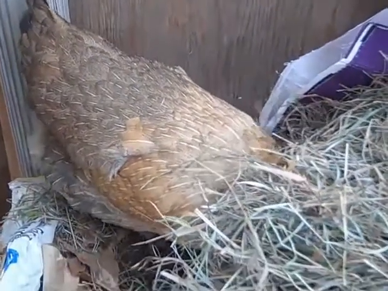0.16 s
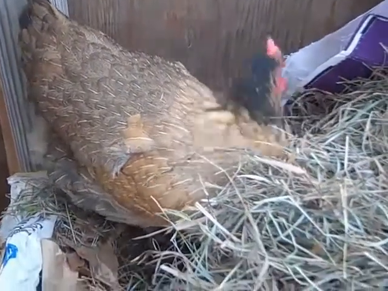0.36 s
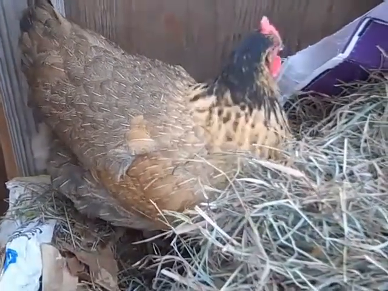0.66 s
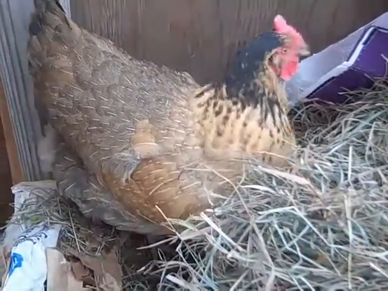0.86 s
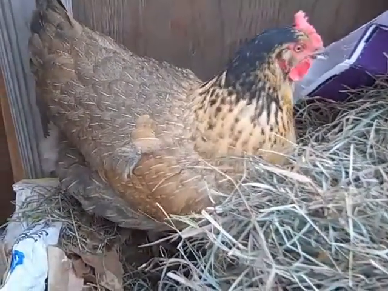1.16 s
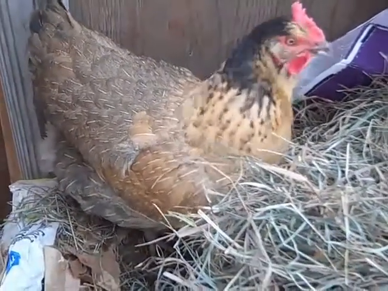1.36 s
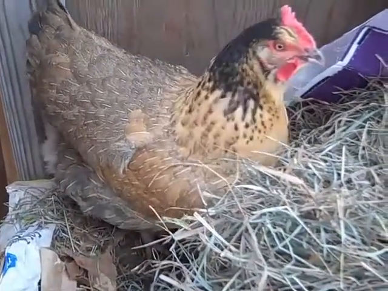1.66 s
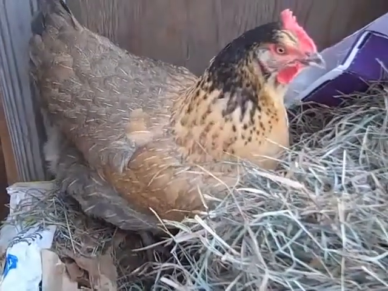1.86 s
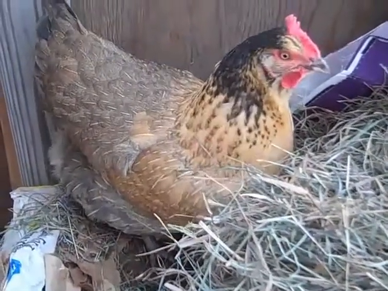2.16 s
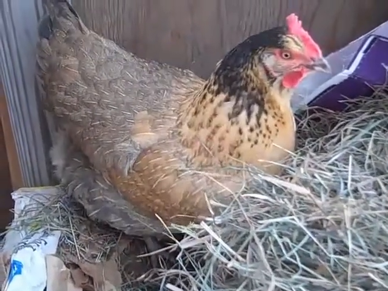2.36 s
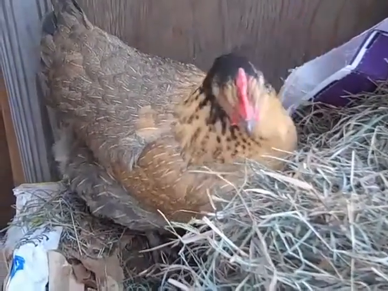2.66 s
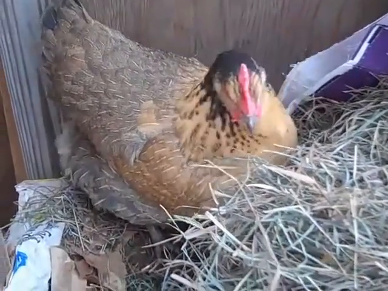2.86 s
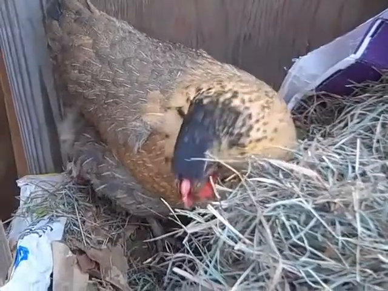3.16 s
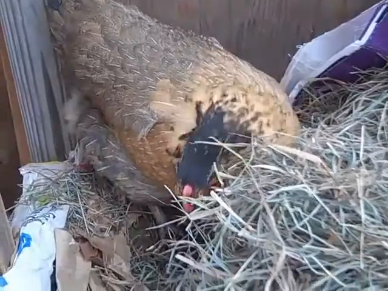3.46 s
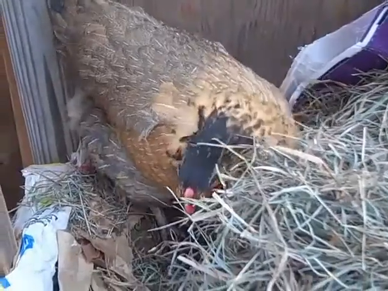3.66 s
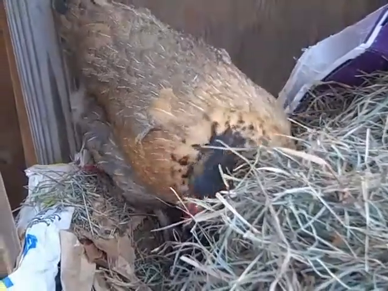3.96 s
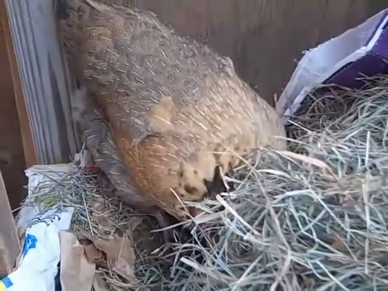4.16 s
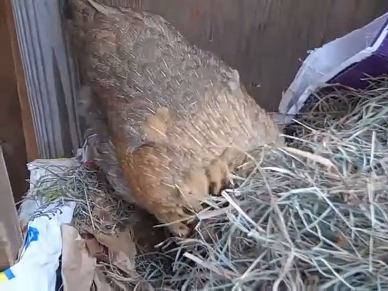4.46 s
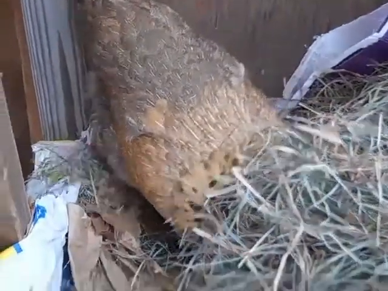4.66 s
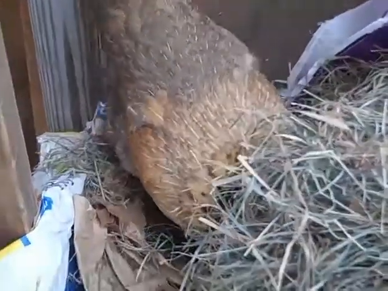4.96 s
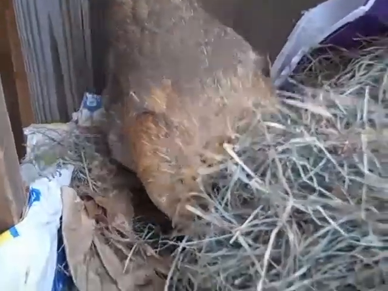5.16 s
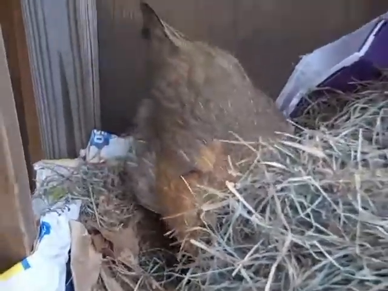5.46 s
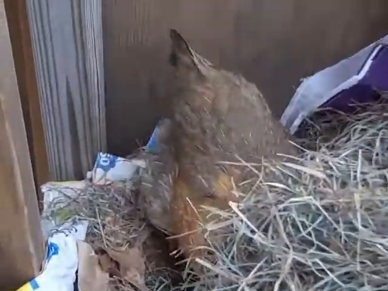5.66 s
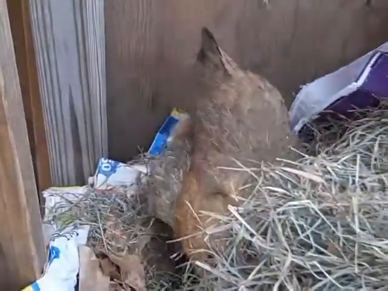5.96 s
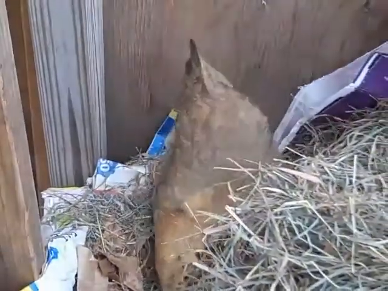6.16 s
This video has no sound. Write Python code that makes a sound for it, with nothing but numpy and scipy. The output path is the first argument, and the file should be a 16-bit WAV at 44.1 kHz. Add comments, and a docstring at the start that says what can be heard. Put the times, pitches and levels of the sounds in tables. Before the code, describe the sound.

Close up in a small wooden coop, a hen clucks in short, dry, low pulses about four times a second, pausing briefly once. Hay rustles lightly at first. As her head goes down the clucks turn softer and muffled, and the hay swishes and snaps more, continuing after her last cluck. A quiet yard hum lies beneath.

```python
"""Hay rustles over the quiet hum of a yard, and a hen in a small wooden coop soon starts to cluck on her nest.
Each cluck is a short run of syrinx pulses through windpipe, chest and beak; its colour follows her head's pose.
As she turns about, filtered noise makes swishes in the hay and short ringing ticks make stalks snap.
Later come faint whistles of narrow-band noise from the yard, and a dull low bump inside two clucks.
Her clucks grow fainter as her head goes down, and the hay stirs on after the last one."""
import sys
import numpy as np
from scipy import signal
from scipy.fft import rfft, irfft
from scipy.io import wavfile
from scipy.ndimage import uniform_filter1d

SR = 44100
rng = np.random.default_rng(int(sys.argv[2]) if len(sys.argv) > 2 else 0)


def store_wav(level_fs):
    """Save 16-bit WAV to argv[1]."""
    pcm = np.round(np.clip(np.atleast_2d(level_fs), -1, 1) * 32767)
    wavfile.write(sys.argv[1], SR, pcm.T.astype(np.int16))


N = 277830  # length of the scene in samples
SPAN = 4096  # samples worked out for one short sound
SPAN_T, SPAN_HZ = np.arange(SPAN) / SR, np.fft.rfftfreq(SPAN, 1 / SR)  # its times (s) and frequencies (Hz)
LEAD_S = .0052  # a dull first flap of the syrinx comes this much before the pulses


def gain_of(db):
    """Turns decibels into a factor."""
    return 10 ** (np.asarray(db) / 20)


def evened(x):
    """Scales a sound to an average (rms) strength of 1."""
    return x / np.sqrt(np.mean(x ** 2) + 1e-20)


def read(points, hz):
    """Reads a curve of (Hz, value) points, joined by straight lines on a log frequency axis."""
    f, value = np.transpose(points)
    return np.interp(np.log(hz + 1), np.log(f + 1), value)


def add(mix, s, sound):
    """Mixes a sound in, starting at s seconds."""
    part = mix[round(s * SR):][:len(sound)]
    part += sound[:len(part)]


def ring(f, hz, width_hz):
    """Response of one resonance, with gain 1 at its centre."""
    return 1j * f * width_hz / (hz ** 2 - f ** 2 + 1j * f * width_hz)


def noise(field_db, size, patchy_db):
    """Noise built from random short spectra; field_db(hz, t) shapes it and soft patches vary its level."""
    frames, hz = 4 * N // size + 5, np.fft.rfftfreq(size, 1 / SR)
    a, b, patches = rng.standard_normal((frames, len(hz), 3)).T
    patches = uniform_filter1d(patches, size=9, axis=0)
    patches = evened(uniform_filter1d(patches, size=12, axis=1))
    t = np.arange(frames) * size / 4 / SR
    spectra = (a + 1j * b) * gain_of(field_db(hz[:, None], t) + patchy_db * patches)
    return signal.istft(spectra, nperseg=size, noverlap=3 * size // 4)[1][:N]


def yard_hum():
    """Steady distant hum and hiss: noise with a fixed colour and two slightly stronger narrow bands."""
    # colour of the hum before levelling: f/Hz, relative density/dB
    colour = [(12, -28), (20, -5), (49, -7.5), (146, -16.5), (399, -6.5), (897, -4), (1530, -8.5),
              (3340, -20.5), (9400, -30.5), (14700, -34), (16000, -50)]
    # narrow bands in the hum: f/Hz, width/Hz, height above the hum/dB
    bands = [(1200, 46, 2.5), (1544, 52, 4)]

    def field_db(hz, t):
        """Colour of the hum, the same at all times."""
        peaks = sum(db / (1 + (2 * (hz - f) / width_hz) ** 2) for f, width_hz, db in bands)
        return read(colour, hz) + peaks + 0 * t

    return gain_of(-61) * evened(noise(field_db, size=1024, patchy_db=.8))


def rustle():
    """Dry stalks slide: hiss with a grain of tiny ticks, rising and falling with the stirring."""
    # colour of the hiss before levelling: f/Hz, relative density/dB
    colour = [(120, -27), (200, -13), (283, -4.5), (1140, 6.5), (1320, -19), (1450, 4), (2560, 1),
              (2910, -2.5), (9580, -4.5), (16000, -12.5)]
    # how the hay is stirred: t/s, level/dB, dullness/dB per octave
    stirring = [(0.0, -70, 0.5), (0.33, -52, 2.8), (0.67, -68, -3), (1.4, -68.5, 5), (1.81, -60, 3.5),
                (2.02, -67.5, 5), (2.28, -84, -12.5), (2.92, -63, 5), (3.86, -80, -13), (4.12, -53.5, 2.6),
                (4.4, -64, 4), (4.63, -68, -3.5), (4.76, -58.5, 0.3), (5.15, -52.5, 0), (5.4, -58, 0),
                (6.1, -59.5, -0.2), (6.3, -53, -2.5)]
    s, level_db, dull_db = np.transpose(stirring)

    def field_db(hz, t):
        """Colour of the hiss, tilted by the dullness of the moment."""
        return read(colour, hz) - np.interp(t, s, dull_db) * np.log2((hz + 100) / 5000)

    hiss = noise(field_db, size=256, patchy_db=1.5)
    ticks_db = 2.1 * np.minimum(rng.exponential(1, N // 80 + 1), 5)
    grain = uniform_filter1d(gain_of(ticks_db).repeat(80)[:N], size=40)
    level = gain_of(np.interp(np.arange(N) / SR, s, level_db))
    return level * evened(hiss * grain)


def windpipe(pipe_hz, pipe_width_hz, progress):
    """Windpipe responses, one per pulse: the neck stretches and the resonance climbs; an air sac rings on."""
    neck_stretch = 0.1  # share by which the resonance climbs over one cluck
    centre = pipe_hz * (1 + neck_stretch * (progress[:, None] - .5))
    # two resonances side by side make a broad top
    apart, width = .4 * pipe_width_hz, .8 * pipe_width_hz
    pipe = ring(SPAN_HZ, centre - apart, width) * ring(SPAN_HZ, centre + apart, width)
    pipe = pipe * ring(SPAN_HZ, centre, 730) / abs(pipe).max()
    # the narrow resonance of the air sac lasts from pulse to pulse
    sac = gain_of(-13) * ring(SPAN_HZ, pipe_hz, 75) * ring(SPAN_HZ, pipe_hz, 750)
    return pipe + sac


def causal(power):
    """Filter with this power response that rings as early as it can (minimum phase)."""
    cepstrum = irfft(np.log(power + 1e-10) / 2)
    cepstrum[1:SPAN // 2] *= 2
    cepstrum[SPAN // 2 + 1:] = 0
    return np.exp(rfft(cepstrum))


def throat_and_beak(treble_db, resonances, tuning, tilt_db):
    """Throat and beak response: a broad treble plus resonances, the higher ones damped more."""
    power = abs(gain_of(treble_db) * ring(SPAN_HZ, 4500, 7000)) ** 2
    for pose_hz, pose_db in resonances:
        hz = tuning * pose_hz
        db = pose_db + tilt_db * np.log2(pose_hz / 3500)  # brightness pivots at 3500 Hz
        width_hz = 220 + 0.017 * hz
        resonance = ring(SPAN_HZ, hz, width_hz) * ring(SPAN_HZ, hz, 4 * width_hz)
        power = power + abs(gain_of(db) * resonance) ** 2
    return causal(power)


def near_echoes():
    """The direct sound plus sparse, quickly fading echoes off her own body and the nest hollow."""
    level_db, fade_s = -5, .0045
    echoes = rng.standard_normal(SPAN) * np.exp(-SPAN_T / fade_s)
    echoes *= (rng.random(SPAN) < .15) * (SPAN_T > .0012)
    return 1 + gain_of(level_db) * rfft(echoes) / np.linalg.norm(echoes)


def cluck(length, first_hz, settled_hz, rough, level_db, swell_db, lead_db, pipe_hz, pipe_width_hz,
          tuning, tilt_db, open_db, pose):
    """Syrinx pulses glide in pitch and swell, then stop; windpipe, chest and beak each colour them."""
    # how her head is held: pose: (chest level/dB, broad treble/dB, [(f/Hz, level/dB) of each resonance])
    poses = {"in the hay": (-17, -35, [(1470, -11.5), (2840, -23.5), (3850, -26), (4900, -27.5),
             (6000, -20.5), (7420, -25), (7980, -26), (9230, -27)]), "low": (-18, -39, [(1530, -14),
             (2300, -19.5), (2940, -13), (3780, -25), (4750, -31), (5880, -25), (6950, -30), (7800, -34),
             (9270, -32)]), "up, side on": (-23.5, -44.5, [(2030, -23.5), (2940, -19.5), (3620, -21.5),
             (4830, -37.5), (5730, -39), (7220, -33), (8900, -41.5), (12000, -40.5)]),
             "up, looking off": (-23, -46, [(2060, -25.5), (2900, -23), (3620, -19), (4800, -39),
             (5750, -42.5), (7700, -39.5), (9100, -41.5), (12300, -48)]),
             "up, facing": (-21, -39, [(1900, -21.5), (2840, -14.5), (3400, -17), (4280, -25), (5600, -35),
             (6950, -30.5), (10300, -33.5), (11600, -33)]), "turning down": (-26, -35.5, [(1910, -17.5),
             (2870, -17.5), (3450, -15), (4450, -24.5), (5590, -29.5), (7000, -29.5), (11100, -37),
             (12000, -33.5), (13480, -36)]), "under the breast": (-13, -47, [(1457, -11), (2480, -9),
             (3980, -37), (4710, -52), (9660, -28), (10500, -30), (11670, -35), (12140, -33)]),
             "tucked": (-12.5, -44.5, [(1675, -10.5), (2150, -17), (2880, -32), (3880, -54), (5900, -38),
             (9480, -23.5), (10550, -33), (11700, -44), (13900, -42)]), "buried": (-15.5, -50, [(1550, -27),
             (2290, -22.5), (3170, -27), (3980, -30), (7400, -42), (9000, -46), (10200, -48),
             (11500, -51)]), "turned away": (-11, -37, [(2300, -17), (2950, -17), (3550, -16.5),
             (4250, -21.5), (5300, -30.5), (6400, -30), (8740, -24), (9800, -27.5), (13000, -35)])}
    chest_db, treble_db, resonances = poses[pose]
    t, u = SPAN_T, SPAN_T / length
    # pitch moves from first to settled (time constant 9.4 ms), rising in most clucks, falling in two;
    # it also sags by up to 12.84 Hz towards the end
    pitch = settled_hz + (first_hz - settled_hz) * np.exp(-t / 0.0094) - 12.84 * np.minimum(u, 1) ** 4
    turns = np.cumsum(pitch) / SR
    # effort swells over half the length; after 80% it falls at 42 dB per length
    swell = np.minimum(u / 0.5, 1) ** 0.65 + 0.5
    effort = gain_of(swell_db * swell - 42 * np.maximum(u - .8, 0))

    # one pulse per turn; roughness shakes its time and size
    at = np.interp(np.arange(int(turns[int(length * SR)]) + 1), turns, t)
    jitter, uneven = rng.standard_normal((16, 2))[:len(at)].T
    even_sizes = np.interp(at, t, effort)
    sizes = even_sizes * gain_of(3 * rough * uneven)
    steady = even_sizes @ np.exp(-2j * np.pi * np.outer(at, SPAN_HZ))
    shaken_at = np.maximum(at + 0.00052 * rough * jitter, 0)
    clicks = np.exp(-2j * np.pi * np.outer(shaken_at, SPAN_HZ))
    bright = sizes ** 1.15 @ clicks  # harder pulses close more sharply

    # turbulence leaks through in a puff after every pulse
    puffs = np.exp(-(turns % 1) / .45)
    air = rfft(puffs * effort * (u < 1.1) * rng.standard_normal(SPAN)) / np.sqrt(SR / 900)

    pipe = windpipe(pipe_hz, pipe_width_hz, at / length)
    core = irfft(sizes @ (clicks * pipe) + .8 * rough * air * pipe.mean(axis=0))
    chest = gain_of(chest_db) * ring(SPAN_HZ, 442, 590) * ring(SPAN_HZ, 290, 1080)
    beak = gain_of(open_db) * near_echoes() * throat_and_beak(treble_db, resonances, tuning, tilt_db)
    rest = irfft(chest * steady + beak * (bright + 2.5 * rough * air))
    # the early flap starts softly, over about 1 ms
    lead = gain_of(lead_db) * sizes[0] * irfft(pipe[0]) * (1 - np.exp(-t / 0.001))
    whole = np.roll(core + rest, round(LEAD_S * SR)) + lead
    return gain_of(level_db) * whole / np.sqrt(np.sum(core ** 2) / (length * SR))


def coop(x):
    """Sparse reflections of random sign off the boards, each band dying at its own speed."""
    # how fast the echoes die: f/Hz, time to fall by 60 dB/s
    fading = [(200, 0.22), (800, 0.14), (2000, 0.12), (4000, 0.11), (12000, 0.097)]
    taps = np.zeros(SR // 2)
    at = np.arange(100, SR // 2 - 20, 16)
    taps[at + rng.integers(0, 16, len(at))] = rng.choice([-1., 1.], len(at))
    hz, t, spectra = signal.stft(taps, SR, nperseg=128)
    faded = spectra * gain_of(-60 * t / read(fading, hz)[:, None])
    tail = signal.istft(faded, SR, nperseg=128)[1]
    return signal.fftconvolve(x, tail / np.linalg.norm(tail))[:N]


def hen():
    """All clucks with their coop echoes; three different echo tails take turns, as if from three spots."""
    # clucks: t/s, length/s, first pitch/Hz, settled pitch/Hz, roughness/0-1, windpipe level/dB, swell/dB,
    # early flap/dB, windpipe f/Hz, windpipe width/Hz, throat tuning/factor, brightness/dB per octave,
    # beak opening/dB, pose/name
    clucks = [(0.1907, 0.033, 199, 223.3, 0.09, -25.5, 3, -8, 825, 121, 1.02, 0.2, -0.1, "in the hay"),
              (0.4206, 0.039, 160.8, 226.3, 0.32, -23, 12, -14, 888, 268, 1.03, -2, -1, "up, looking off"),
              (0.6637, 0.043, 177.1, 222.7, 0.7, -21.5, 11, -35, 850, 240, 1.01, -0.4, -0.7, "up, looking off"),
              (0.9018, 0.041, 168.5, 237.6, 0.19, -21.5, 4.5, -24, 832, 223, 1.016, -3.5, 3, "up, side on"),
              (1.1342, 0.041, 187.2, 243, 0.24, -20.5, 7.5, -19, 822, 230, 0.98, 0.2, 1, "up, side on"),
              (1.3703, 0.041, 178.6, 232.7, 0.46, -20.5, 10.5, -9, 808, 205, 0.98, 1, -1.5, "up, side on"),
              (1.6018, 0.043, 169.2, 228.3, 0.27, -24.5, 7, -9, 778, 248, 1.01, -0.2, 0.2, "up, facing"),
              (1.8696, 0.044, 174, 219.4, 0.44, -24.5, 9.5, -20, 813, 310, 1.01, -1, 0, "up, facing"),
              (2.5434, 0.04, 190.8, 232.7, 0.42, -23, 8.4, -23, 822, 344, 1.014, -0.5, -0.4, "up, facing"),
              (2.7748, 0.04, 173.5, 224.1, 0.23, -25, 7, -1, 796, 225, 0.99, 0.1, -0.4, "turning down"),
              (2.9975, 0.042, 180.3, 231, 0.34, -24.5, 7, -34, 813, 260, 1.01, 1, 0.3, "turning down"),
              (3.2152, 0.035, 174.3, 220.2, 0.2, -25, 5.5, -4, 840, 212, 1.05, 0.7, 1.3, "low"),
              (3.4093, 0.033, 197.1, 222.7, 0.17, -23, 9.5, 2, 860, 233, 1.02, 0.3, -0.5, "low"),
              (3.599, 0.047, 163, 225.2, 0.12, -29, 8, -19, 810, 294, 0.97, 0.7, -2.5, "tucked"),
              (3.8138, 0.038, 182.7, 227.6, 0.26, -28, 7, -15, 832, 284, 1, 0, -2, "tucked"),
              (4.0451, 0.033, 192.8, 222.4, 0.36, -27.5, 5, -15, 847, 210, 0.992, 0, 0, "under the breast"),
              (4.807, 0.027, 186.3, 168.2, 0.32, -31, 5, -48, 847, 170, 0.95, 3.5, 0, "buried"),
              (5.029, 0.03, 197.4, 199.2, 0.26, -26, 6, -40, 880, 206, 0.995, 1.5, -1.5, "buried"),
              (5.2965, 0.024, 202.7, 191.5, 0.28, -28, 5, -20, 815, 204, 1.02, 3, -0.3, "buried"),
              (5.639, 0.031, 194.7, 212.8, 0.14, -28, 6.1, -48, 840, 205, 0.98, 2.5, -1.5, "turned away"),
              (5.9231, 0.029, 194, 227.7, 0.29, -27.5, 6.5, 0, 866, 247, 0.98, -0.6, 1, "turned away")]
    spots = np.zeros((3, N))
    for k, (s, *settings) in enumerate(clucks):
        add(spots[k % 3], s - LEAD_S, cluck(*settings))
    return sum(x + gain_of(-14.5) * coop(x) for x in spots)


def hay_swishes():
    """A wing or foot drags through the hay: broad noise with a quick rise."""
    # drags: t/s, level before rise and fade/dB, length/s, centre f/Hz
    drags = [(0.3, -65, 0.07, 2100), (2.509, -50, 0.018, 3700), (4.117, -68, 0.043, 320),
             (4.17, -60.5, 0.12, 300), (4.245, -44.5, 0.035, 2780), (4.853, -59, 0.082, 343),
             (4.916, -54.5, 0.068, 1490), (5.129, -54, 0.026, 1750), (5.246, -53.5, 0.031, 463),
             (6.208, -61, 0.038, 2610)]
    out = np.zeros(N)
    for s, db, length, hz in drags:
        scrape = evened(irfft(rfft(rng.standard_normal(SPAN)) * ring(SPAN_HZ, hz, 0.83 * hz)))
        shape = np.minimum(SPAN_T / 0.0062, 1) / (1 + (SPAN_T / length) ** 4)
        add(out, s, gain_of(db) * scrape * shape)
    return out


def stalk_snaps():
    """Single stalks snap: a tick of noise sets off a short ring."""
    # snaps: t/s, level before the soft edges/dB, ring f/Hz
    snaps = [(0.8486, -53.5, 7960), (1.0444, -61, 9240), (1.3382, -58, 2930), (2.4107, -60, 2790),
             (3.5272, -62, 5730), (3.703, -60.5, 4120), (4.6308, -59, 4650), (4.8953, -53, 3970),
             (5.2435, -68, 3560), (5.2749, -47.5, 2460), (5.446, -53.5, 2340), (5.868, -57.5, 4200),
             (6.126, -48.5, 3800), (6.1584, -54, 6660), (6.1843, -51.5, 2790), (6.2233, -46, 1020),
             (6.2343, -47.5, 2650), (6.2833, -53, 4650)]
    out = np.zeros(N)
    for s, db, hz in snaps:
        tick = rng.standard_normal(SPAN) * np.minimum(SPAN_T / .001, 1) * np.exp(-SPAN_T / .0013)
        stalk = 0.13 * ring(SPAN_HZ, 5800, 7900) + ring(SPAN_HZ, hz, 0.5 * hz)
        snap = evened(irfft(rfft(tick) * stalk)[:180])
        add(out, s, gain_of(db) * snap * signal.windows.tukey(180, .3))
    return out


def yard_whistles():
    """Faint fuzzy whistles from far off in the yard: noise through a narrow resonance."""
    # whistles: t/s, length/s, level before the soft edges/dB, f/Hz
    whistles = [(1.66, 0.18, -59.5, 1555), (1.66, 0.23, -68, 1960), (1.67, 0.19, -70, 2600),
                (2.87, 0.09, -73, 3870), (4.33, 0.24, -72, 1525)]
    out = np.zeros(N)
    for s, length, db, hz in whistles:
        size = round(length * SR)
        narrow = ring(np.fft.rfftfreq(4 * SPAN, 1 / SR), hz, 75) ** 2
        fuzz = evened(irfft(rfft(rng.standard_normal(4 * SPAN)) * narrow))[:size]
        add(out, s, gain_of(db) * fuzz * signal.windows.tukey(size, .5))
    return out


def low_bumps():
    """A dull low bump inside two clucks: one short push of a 110 Hz wave."""
    # bumps: t of the middle/s, level of the wave before shaping/dB
    bumps = [(2.8, -42.5), (3.017, -43)]
    out = np.zeros(N)
    for s, db in bumps:
        push = np.exp(-((SPAN_T - .01) / .003) ** 2)
        add(out, s - .01, gain_of(db) * np.sin(2 * np.pi * 110 * SPAN_T) * push)
    return out


def scene():
    """Yard, hay and hen together; swishes, snaps and bumps also echo in the coop."""
    background = yard_hum() + rustle()
    clucking = hen()
    events = hay_swishes() + stalk_snaps() + low_bumps()
    echoed = events + gain_of(-4.0) * coop(events)
    return (background + clucking + echoed + yard_whistles())[None]


def record(dry):
    """Adds a small steady offset and cuts the treble above about 15900 Hz."""
    band_limit = signal.firwin(401, 15900, window=("kaiser", 8), fs=SR)
    return signal.oaconvolve(dry - .0004, band_limit[None], "same")


dry = scene()
out = record(dry)
store_wav(out)
```